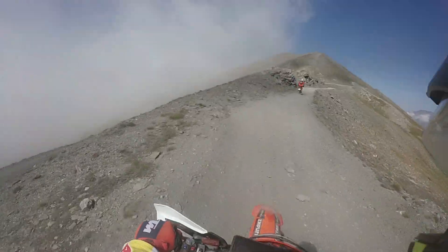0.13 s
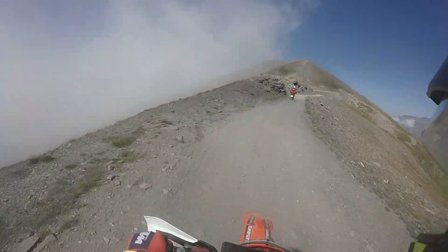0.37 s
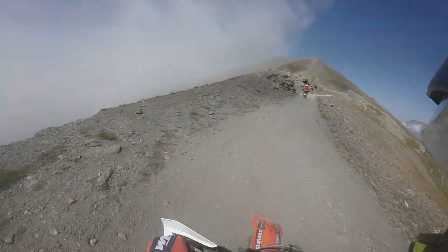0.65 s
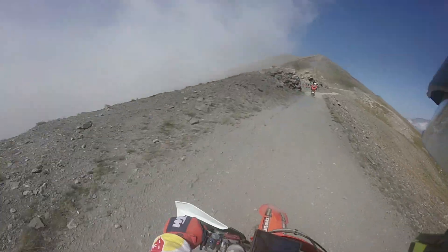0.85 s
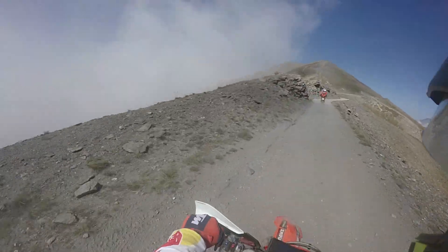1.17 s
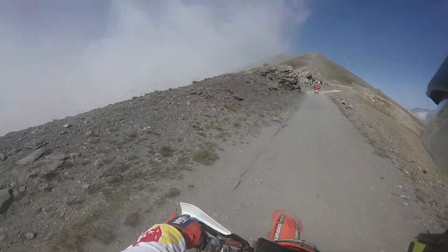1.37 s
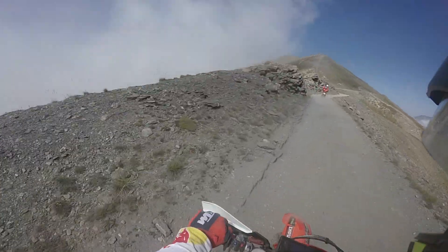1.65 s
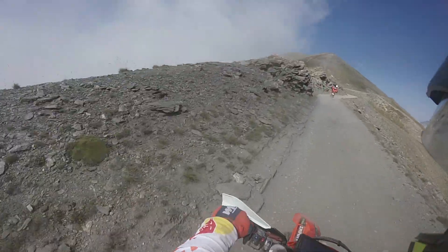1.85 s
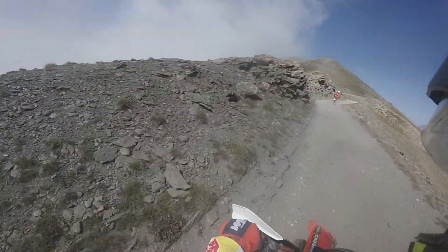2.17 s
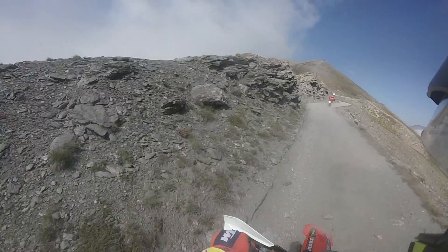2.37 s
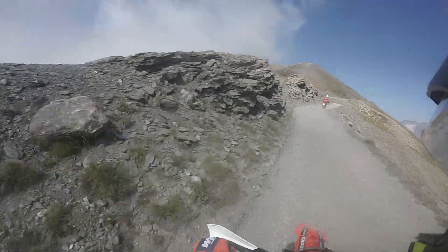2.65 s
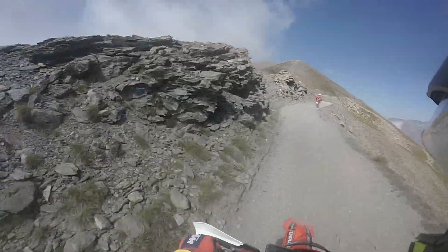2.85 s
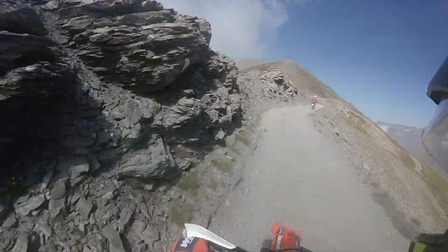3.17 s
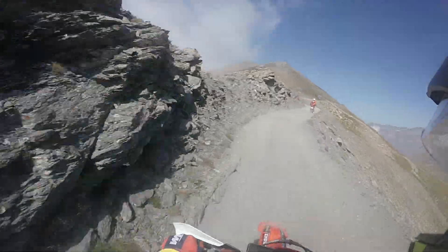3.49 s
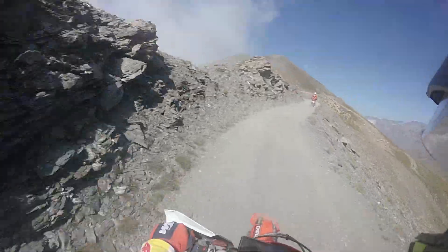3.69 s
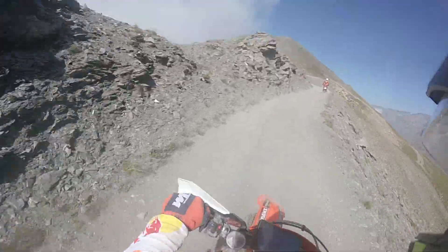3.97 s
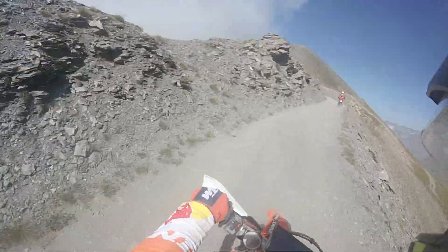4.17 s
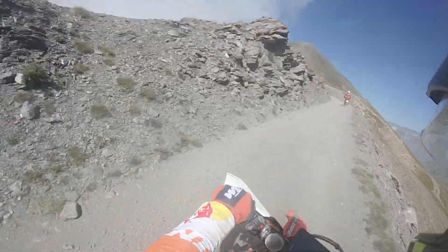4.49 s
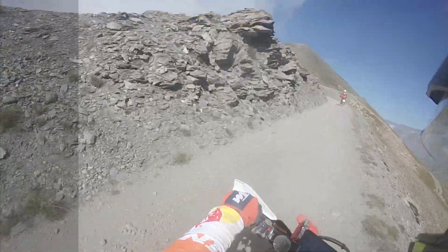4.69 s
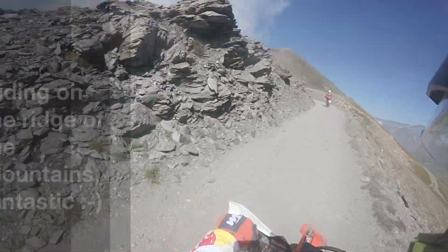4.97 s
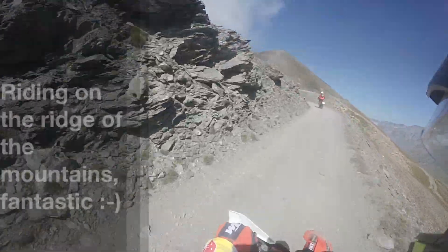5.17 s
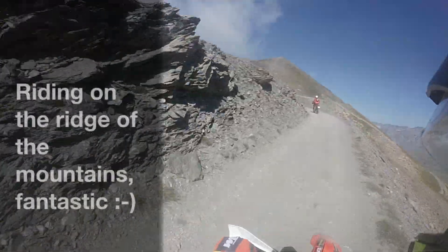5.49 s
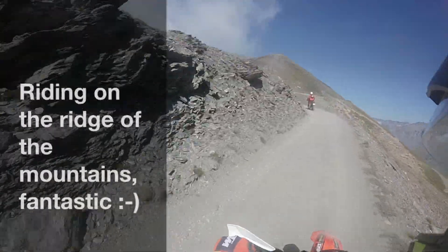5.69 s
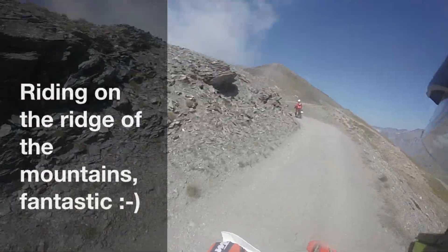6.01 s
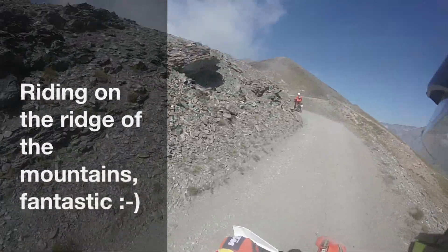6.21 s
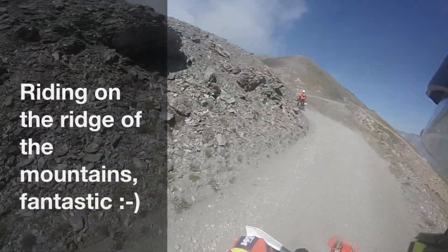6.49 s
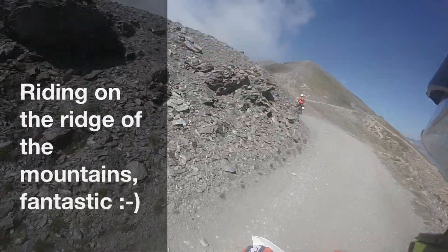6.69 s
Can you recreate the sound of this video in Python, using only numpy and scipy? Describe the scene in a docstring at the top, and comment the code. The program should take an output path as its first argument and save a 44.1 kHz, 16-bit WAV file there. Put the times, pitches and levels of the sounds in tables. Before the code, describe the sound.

A single-cylinder four-stroke dirt bike is heard close up from the rider's helmet on a gravel track. From the start it pulls hard, rising steadily in pitch, with a faint metallic ring near the top around 1.5 seconds. At 1.7 seconds it shifts up and the revs drop. From about 2 seconds it pulls again, climbing more gently. At 3.5 seconds the throttle closes and the engine falls into a ragged burble. From 4.7 seconds to the end, near 7 seconds, it chugs along at low revs. Wind buffets and hisses on the microphone throughout, over a gritty grind of tyres and chain, and its deep rumble grows toward the end. Stones thud under the wheels now and then, most strongly around 5.1, 5.9 and 6.7 seconds. Gravel rattles lightly on the guards, mostly around 6 seconds.

```python
"""A single-cylinder four-stroke trail bike climbs a gravel track, heard from the rider's helmet.
It pulls hard, each firing ringing the exhaust pipe, and a bracket sings near top revs. At 1.7 s the
rider shifts up, opens up again, then rolls off at 3.5 s into a burble. From 4.7 s the bike lugs along
on a little throttle while gravel rattles on the guards and the wind rumble grows. All the way, wind
buffets the microphone port and hisses round the housing, tyres and chain grind, and stones thud."""
import sys
import numpy as np
from scipy.fft import rfft, irfft, next_fast_len
from scipy.io import wavfile
from scipy.ndimage import map_coordinates

SR = 44100
rng = np.random.default_rng(int(sys.argv[2]) if len(sys.argv) > 2 else 0)


def generate_wav(signal):
    """Clip the signal to [-1, 1] and save it as 16-bit WAV at the path in sys.argv[1]."""
    frames = np.transpose(np.atleast_2d(signal))
    scaled = np.clip(frames, -1, 1) * 32767
    pcm = np.round(scaled).astype(np.int16)
    wavfile.write(sys.argv[1], SR, pcm)


N = 302085
T = np.arange(N) / SR

# engine revs: t/s, firing rate/Hz
FIRING_RATE = [(0.0, 39.96), (0.13, 40.74), (0.22, 42.71), (0.36, 44.56), (0.5, 45.39), (0.64, 49.55),
               (0.84, 53.05), (0.95, 50.81), (1.14, 54.53), (1.25, 54.3), (1.35, 57.11), (1.56, 57.09),
               (1.7, 54.03), (2.04, 41.69), (2.21, 43.22), (2.4, 43.98), (2.7, 46.14), (3.1, 47.78),
               (3.3, 48.98), (3.51, 49.46), (4.2, 42.72), (4.58, 39.39), (4.75, 40.81), (5.02, 38.55),
               (5.5, 38.01), (5.75, 37.87), (6.02, 38.72), (6.35, 36.86), (6.85, 36.47)]
# resonances of the frame: f/Hz, width/Hz, level/dB
FRAME_MODES = [(673, 266, -0.5), (1154, 493, -1), (1268, 201, -0.5)]


def engine():
    """Each firing rings the pipe; off throttle the burn turns ragged and the puffs are noise."""
    # the rider's hand: t/s, share of even firings/0-1, throttle opening/0-1
    throttle = [(0, .99, 1), (1.57, .98, 1), (1.68, .25, .4), (2.03, .25, .4), (2.09, .98, 1),
                (3.42, .98, 1), (3.55, .2, .3), (4.5, .2, .1), (4.75, .95, .03), (6.85, .92, .03)]
    # engine mix: t/s, exhaust level/dB, upper pipe level/dB, crack level/dB
    faders = [(0, -12, -21, -42), (.35, -15.5, -21, -35.5), (.75, -19, -22.5, -36),
              (.88, -22.5, -31.5, -35.5), (.95, -19.5, -22.5, -38.5), (1.15, -20.5, -30, -37),
              (1.58, -17, -27, -39.5), (1.75, -24.5, -32.5, -40), (2.02, -25, -26.5, -50),
              (2.3, -21.5, -22.5, -43.5), (2.65, -21, -22.5, -35.5), (2.9, -18.5, -23, -38),
              (3.1, -18, -21.5, -37), (3.43, -25, -28.5, -42), (3.54, -26.5, -41, -41),
              (3.75, -23.5, -29.5, -64), (4.0, -27.5, -35, -60), (4.2, -34.5, -38.5, -66),
              (4.47, -32.5, -58, -37), (4.72, -23, -38.5, -37), (5.15, -23, -32.5, -34),
              (5.5, -21.5, -40, -35), (5.9, -20.5, -35.5, -38), (6.68, -21.5, -33.5, -32.5),
              (6.85, -29.5, -66, -40.5)]
    # off-throttle burbles: peak t/s, swell/dB
    burbles = [(1.7, 1.5), (1.87, 3.5), (1.92, 5.5), (1.97, 1.5), (3.615, 7.5), (3.71, 3.5), (3.77, 3.5),
               (3.82, 4.5), (3.885, 4.5), (3.94, 7), (4.04, 6.5), (4.1, 5), (4.2, 9), (4.24, 3), (4.295, 5),
               (4.33, 4)]
    even, opening = curves(throttle)
    burble_db = sum(db * np.exp(-((T - s) / .022) ** 2) for s, db in burbles)
    lurch_db = 1.3 * (1 - even)  # an uneven burn makes the level lurch
    exhaust_db, upper_db, crack_db = [db + burble_db + lurch_db * wobble(14) for db in curves(faders)]
    cycles = .48 + np.cumsum(curves(FIRING_RATE)[0]) / SR
    firings = np.interp(np.arange(1, int(cycles[-1])), cycles, T)
    scatter = rng.standard_normal((6, len(firings)))
    firings += .00003 * scatter[0]
    spread_db = .6 * opening + 2.2 * (1 - opening)  # firings vary more when lugging
    blows = train(firings, amp(np.interp(firings, T, spread_db) * scatter[1]))
    puff_shape = .6 + np.exp(-3 * (cycles % 1))
    puffs = unit(rng.standard_normal(N) * puff_shape * amp(1.3 * wobble(30)))
    drive = lowpass(blend(blows, puffs, even), hz=1500, poles=2)
    crack, burn = cracks(firings, cycles, even, opening, scatter[2:])
    pipe = amp(exhaust_db) * exhaust(drive, puffs, even, opening) + amp(upper_db) * upper_pipe(drive)
    return pipe + amp(crack_db) * crack + pop(blows) + rasp(burn) + gear_whine(drive)


def exhaust(drive, puffs, even, opening):
    """The pipe's low voice: firings ring it, open or lugging; ragged puffs blow through it cold."""
    # pipe resonances when open, lugging and cold: f/Hz, width/Hz, level/dB
    open_modes = [(98.6, 47, -23), (267.4, 18, -3)]
    lugging_modes = [(81.1, 7.2, -2.5), (150.2, 25.5, 0.5), (221, 61, 0), (262.7, 35.5, 3.5),
                     (399, 107, -15.5)]
    cold_modes = [(175, 39, -2.5), (263, 126, -1), (389, 124, -2.5)]
    # rings either side of the open pipe's main one: t/s, lower level/dB, higher level/dB
    flanks = [(0, -15, -15.5), (.45, -16.5, -5.5), (1.0, -17, 0), (1.5, -7, -24), (2.1, -7, -7.5),
              (2.5, -18, 1), (3.5, -1, -1)]
    lower_db, higher_db = curves(flanks)
    at_outlet = delay(drive, seconds=.0036)
    at_chamber = delay(at_outlet, seconds=.00896)  # the silencer's far chamber answers late
    lower = amp(lower_db) * ring(at_outlet, [(211.2, 35, 0)])
    higher = amp(higher_db) * ring(at_chamber, [(301.4, 13, 0)])
    pulling = ring(at_outlet, open_modes) + lower - higher
    lugging = ring(delay(drive, seconds=.0012), lugging_modes)
    firing = blend(pulling, lugging, opening)
    return blend(firing, ring(puffs, cold_modes), even)


def upper_pipe(drive):
    """The midrange: firings ring the pipe's upper modes and, more softly, shake the frame."""
    # upper pipe resonances: f/Hz, width/Hz, level/dB
    modes = [(286, 62, 2), (436.5, 21.4, 11.5), (525.3, 52.4, 11), (604, 41, 12), (703, 40, -9.5),
             (866, 25, -34), (922, 30, 1)]
    return ring(drive, modes) + amp(-6.5) * ring(drive, FRAME_MODES)


def cracks(firings, cycles, even, opening, scatter):
    """Two cracks a cycle, burn then valve, ring the head. Returns the sound and the bare burn clicks."""
    # valve crack, closer behind the burn in hot gas: t/s, level over the burn/dB, gap/s
    valve_timing = [(0, -4, .0042), (.6, -5, .0042), (1.0, 0, .0043), (1.6, 0, .0043), (2.3, 2.5, .0046),
                    (3.3, 1, .0045), (4.7, 0, .0047)]
    # resonances of the head, open and lugging, and of the valve: f/Hz, width/Hz, level/dB
    open_modes = [(1890, 1020, 2), (2920, 510, 4.5), (3580, 630, -0.5)]
    lugging_modes = [(1160, 68, 1), (1470, 290, -0.25), (1580, 270, -1.9)]
    valve_modes = [(1920, 650, 11), (2860, 1300, -6)]
    jitter_s, spread_db = .00004, 1.3  # from crack to crack
    valve_db, gap_s = curves(valve_timing)
    lag_s = .0007 * opening + .0125 * (1 - opening)  # the burn cracks later when lugging
    burn_times = firings + np.interp(firings, T, lag_s) + jitter_s * scatter[0]
    valve_times = burn_times + np.interp(firings, T, gap_s) + jitter_s * scatter[1]
    burn = train(burn_times, amp(spread_db * scatter[2]))
    valve = amp(valve_db) * train(valve_times, amp(spread_db * scatter[3]))
    clatter_phase = (cycles - .44 * (1 - opening)) % 1
    clatter = unit(rng.standard_normal(N) * (.4 + np.exp(-4 * clatter_phase)))
    crispness = even * (.35 + .62 * opening)  # share of clean clicks against noisy clatter
    knock = blend(burn, clatter, crispness)
    valve_gain = np.sqrt(crispness * np.mean(valve ** 2))
    sharp = ring(knock, open_modes) + valve_gain * ring(valve, valve_modes)
    dull = ring(knock + np.sqrt(crispness) * valve, lugging_modes)
    return lowpass(blend(sharp, dull, opening), hz=6000, poles=4), burn


def pop(blows):
    """Each firing's pressure front pops as it leaves the pipe."""
    # strength of the front: t/s, level/dB
    fader = [(0, -31), (.4, -40.5), (.8, -47), (1.1, -44), (1.55, -38), (1.7, -45), (2.0, -46),
             (2.15, -40.5), (2.6, -35.5), (3.1, -37.5), (3.42, -34), (3.55, -41), (4.5, -41), (4.75, -43),
             (6.85, -41)]
    # resonances of the pop: f/Hz, width/Hz, level/dB
    modes = [(648, 230, 1), (915, 43, 4.5), (1200, 79, -1)]
    return amp(curves(fader)[0]) * ring(delay(blows, seconds=.0046), modes)


def rasp(burn):
    """Two narrow, wandering rings of the silencer, struck by the burn cracks."""
    # the silencer's high and low ring: t/s, f/Hz, level/dB
    high = [(0, 1640, -55), (.25, 1760, -56), (.33, 1730, -43), (.55, 1715, -40.5), (.75, 1640, -42),
            (.9, 1700, -43.5), (1.2, 1705, -41.5), (1.5, 1850, -52), (1.65, 1790, -63), (2.15, 1720, -59),
            (2.35, 1770, -41), (2.7, 1680, -43), (3.0, 1680, -42), (3.4, 1700, -48), (3.55, 1750, -67)]
    low = [(0, 1330, -45), (.2, 1314, -49), (.6, 1410, -54), (.75, 1350, -38), (.9, 1320, -43),
           (1.05, 1296, -32.5), (1.27, 1350, -34), (1.38, 1370, -54), (2.15, 1210, -57), (2.3, 1250, -40),
           (2.47, 1286, -37), (2.6, 1450, -42), (2.85, 1500, -45.5), (3.2, 1490, -46), (3.5, 1470, -62)]
    return sum(amp(db) * glide(burn, hz, width_hz=58) for hz, db in (curves(high), curves(low)))


def gear_whine(drive):
    """Each firing loads the gear teeth, which ring at the meshing rate."""
    # gear mesh: t/s, pitch/multiples of the firing rate, level/dB
    mesh = [(0, 23, -31), (.33, 23, -34), (.42, 20, -44), (.55, 19.5, -35), (1.0, 19.5, -35),
            (1.55, 19.5, -35), (1.65, 19.5, -58), (2.2, 20.5, -50), (2.5, 20.5, -37), (3.2, 20.5, -37),
            (3.5, 20.5, -50), (3.6, 20.5, -70)]
    multiple, db = curves(mesh)
    return amp(db) * glide(drive, multiple * curves(FIRING_RATE)[0], width_hz=50)


def bracket():
    """A metal bracket, shaken unevenly, sings in one narrow resonance near top revs."""
    # the bracket's note: t/s, f/Hz, level/dB
    note = [(1.25, 2760, -56), (1.4, 2740, -46), (1.55, 2750, -42.5), (1.66, 2700, -46), (1.83, 2670, -49),
            (1.95, 2670, -57), (2.02, 2670, -70)]
    hz, db = curves(note)
    shake = rng.standard_normal(N) * amp(1.5 * wobble(35))
    return amp(db) * glide(shake, hz, width_hz=110)


def jolts():
    """Stones under the wheel: each a short thud of two low modes and a bright snap."""
    # stone strikes: t/s, thud level/dB, snap level/dB, thud f/Hz
    stones = [(1.845, -7, -29, 232), (2.111, -8, -32, 273), (2.955, -8, -32, 420), (3.603, -10, -40, 268),
              (4.741, -8.5, -38, 277), (5.105, -8, -38, 196), (5.122, -5, -42, 131),
              (5.143, -2.5, -40, 123), (5.179, -3, -38, 169), (5.948, 0, -34, 162), (6.262, -19, -42, 169),
              (6.412, -8, -44, 169), (6.611, -14, -40, 203), (6.667, 2, -30, 150)]
    # resonances of the snap: f/Hz, width/Hz, level/dB
    snap_modes = [(1700, 810, -0.51), (3160, 1300, 0.58), (4500, 1100, -2)]
    thud_s, snap_s = .04, .025  # time to fall 60 dB
    out, t = np.zeros(N + SR), np.arange(SR // 10) / SR
    sizzle = ring(rng.standard_normal(N + SR), snap_modes)
    for s, thud_db, snap_db, hz in stones:
        start = round(s * SR)
        body = np.sin(2 * np.pi * hz * t) + .7 * np.sin(2 * np.pi * 1.7 * hz * t)
        thud = amp(thud_db - 60 * t / thud_s) * (1 - np.exp(-t / .004)) * body
        snap = amp(snap_db - 60 * t / snap_s) * (1 - np.exp(-t / .001)) * sizzle[start:][:len(t)]
        out[start:][:len(t)] += thud + snap
    return out[:N]


def wind_and_grind():
    """Lumpy wind on the port, hiss round the housing, tyre and chain grit in the frame."""
    # wind on the port, tyres and chain: t/s, buffet level/dB, grind level/dB
    faders = [(0, -25.5, -31), (.5, -28, -35), (1.0, -27.5, -33), (1.5, -27, -33), (1.62, -25, -30),
              (1.9, -32, -35), (2.05, -30, -35), (2.3, -28, -34), (2.75, -27, -35), (3.3, -28, -33),
              (3.55, -28, -34), (3.9, -27, -32), (4.1, -28, -33), (4.22, -25, -29), (4.46, -30, -37.5),
              (4.75, -28.5, -33), (5.05, -27.5, -39), (5.4, -27.5, -40), (5.95, -25, -31.5),
              (6.5, -23, -41.5), (6.85, -22, -32.5)]
    # deep wind rumble and housing hiss: t/s, level/dB
    rumble_fader = [(0, -40), (.8, -43), (1.3, -41.5), (2.0, -40), (2.7, -38), (3.4, -39), (4.2, -36.5),
                    (4.7, -37), (5.6, -32), (6.2, -34), (6.85, -24.5)]
    hiss_fader = [(0, -32), (.5, -36), (1.0, -34), (1.58, -34.5), (1.9, -39), (2.3, -33), (2.75, -34),
                  (3.3, -34), (3.55, -36), (4.18, -38), (4.46, -39), (4.75, -34), (5.05, -34), (5.4, -33),
                  (5.95, -30.5), (6.5, -33), (6.85, -35.5)]
    # tone of the three wind layers: f/Hz, level/dB
    rumble_eq = [(12, -43), (25, -4), (45, 3.5), (70, 7), (110, -7), (200, -46)]
    buffet_eq = [(40, -47), (80, -5.5), (130, -4), (200, -5.5), (300, -10), (500, -10.5), (900, -38),
                 (1600, -39.5), (2600, -120)]
    hiss_eq = [(880, -2.5), (1500, -0.5), (1900, -8), (2400, -9), (3400, -7), (4200, -10), (5900, -10.5),
               (7000, -20.5), (8600, -26), (9700, -22), (10800, -30.5), (12600, -22), (14000, -40.5),
               (15200, -42)]
    gust_db = 1.4
    port_db, grind_db = curves(faders)
    rumble_db = curves(rumble_fader)[0] + gust_db * wobble(1.6)
    buffet_db = port_db + gust_db * wobble(6.6)
    rumble = coloured(rng.standard_normal(N), rumble_eq)
    buffet = coloured(rng.standard_normal(N) * amp(.8 * wobble(14) + 1.5 * wobble(45)), buffet_eq)
    grit = rng.standard_normal(N) * amp(2.0 * wobble(40) + 1.5 * wobble(150))
    hiss = coloured(rng.standard_normal(N) * amp(.57 * wobble(25) + 1.28 * wobble(300)), hiss_eq)
    wind = amp(rumble_db) * rumble + amp(buffet_db) * buffet + amp(curves(hiss_fader)[0]) * hiss
    return wind + amp(grind_db) * ring(grit, FRAME_MODES)


def gravel():
    """Small stones thrown up against the guards, rattling in flurries."""
    # gravel spray: t/s, level/dB
    fader = [(0, -60), (1.5, -74), (3, -59), (4.4, -57.5), (5.0, -56), (5.5, -54), (5.9, -45.5), (6.3, -47),
             (6.6, -50.5), (6.85, -56)]
    # resonances of the guards: f/Hz, width/Hz, level/dB
    guard_modes = [(3320, 320, 4), (4770, 1000, 0.5), (9900, 740, -4), (13300, 1500, -4)]
    hits_per_s, spread_db = 1500, 4
    hits = (rng.random(N) < hits_per_s / SR) * amp(spread_db * rng.standard_normal(N))
    return amp(curves(fader)[0] + 2.3 * wobble(3.9)) * ring(hits - hits.mean(), guard_modes)


def amp(db):
    """Gain of a level in dB."""
    return 10 ** (np.asarray(db) / 20)


def unit(x):
    """Scaled to rms 1."""
    return x / np.sqrt(np.mean(x ** 2) + 1e-20)


def blend(a, b, share):
    """Equal-power crossfade: all a at share 1, all b at 0."""
    return np.sqrt(share) * a + np.sqrt(1 - share) * b


def delay(x, seconds):
    """x made late, its end wrapping to the start."""
    return np.roll(x, round(seconds * SR))


def curves(rows):
    """One value per sample for each column after the time."""
    s, *cols = np.transpose(rows)
    return [np.interp(T, s, c) for c in cols]


def wobble(rate):
    """A smooth random curve, rate knots a second."""
    return map_coordinates(rng.standard_normal(int(N * rate / SR) + 4), [T * rate])


def train(times, sizes):
    """One impulse at each time, rms 1."""
    return unit(np.bincount(np.clip(np.round(times * SR).astype(int), 0, N - 1), sizes, N))


def filtered(x, response):
    """x through a complex frequency response."""
    m = next_fast_len(N + SR // 2)
    return irfft(rfft(x, m) * response(np.fft.rfftfreq(m, 1 / SR)), m)[..., :N]


def lowpass(x, hz, poles):
    """x through a chain of one-pole low-passes."""
    return filtered(x, lambda f: 1 / (1 + 1j * f / hz) ** poles)


def ring(x, modes):
    """x through parallel resonances of alternating polarity, rms 1."""
    return unit(filtered(x, lambda f: sum(
        (-1) ** k * amp(db) * 1j * f * width / (hz * hz - f * f + 1j * f * width)
        for k, (hz, width, db) in enumerate(modes))))


def coloured(x, points):
    """x through an EQ curve of (f/Hz, level/dB) points, rms 1."""
    hz, db = np.transpose(points)
    return unit(filtered(x, lambda f: amp(np.interp(np.log(f + 1), np.log(hz + 1), db))))


def glide(x, hz, width_hz):
    """x through one resonance whose centre moves, rms 1."""
    turn = np.exp(2j * np.pi * np.cumsum(hz) / SR)
    held = lowpass(x * [turn.real, turn.imag], width_hz, poles=2)
    return unit(held[0] * turn.real + held[1] * turn.imag)


def scene():
    """All sources at the one microphone, which flips the polarity."""
    return -(engine() + bracket() + wind_and_grind() + jolts() + gravel())[None]


def record(dry):
    """The housing muffles the treble; nothing passes above the band limit."""
    muffle_hz, top_hz = 6300, 15100
    return filtered(dry, lambda hz: (hz < top_hz) / (1 + (hz / muffle_hz) ** 6) ** .5)


dry = scene()
out = record(dry)
generate_wav(out)
```